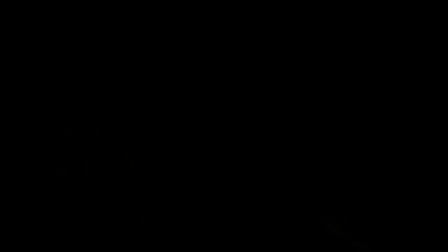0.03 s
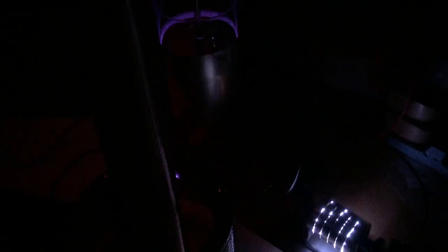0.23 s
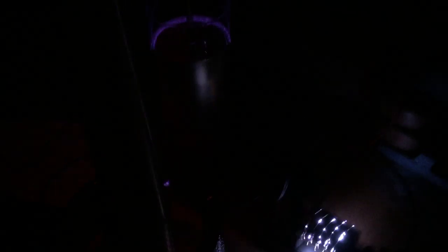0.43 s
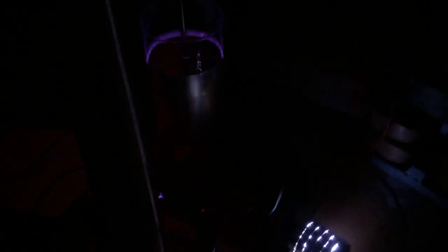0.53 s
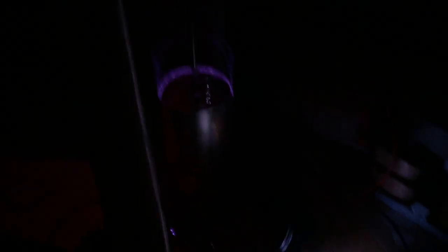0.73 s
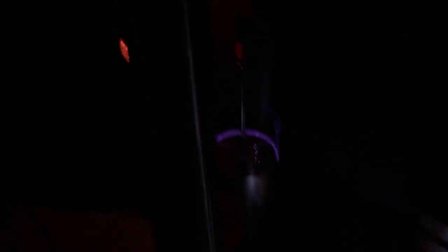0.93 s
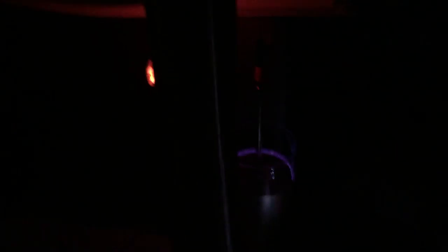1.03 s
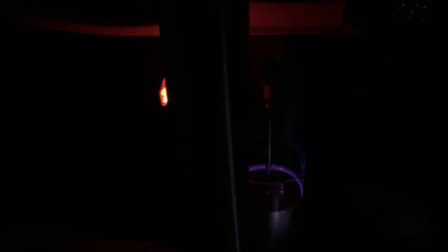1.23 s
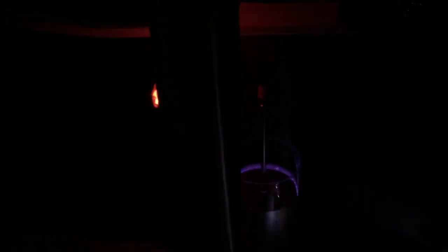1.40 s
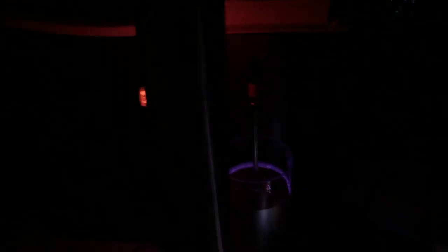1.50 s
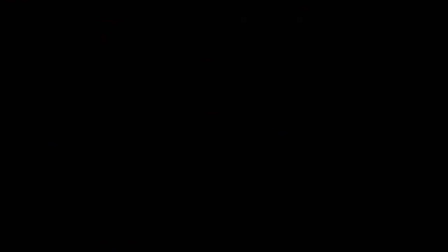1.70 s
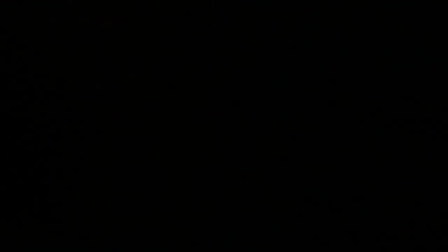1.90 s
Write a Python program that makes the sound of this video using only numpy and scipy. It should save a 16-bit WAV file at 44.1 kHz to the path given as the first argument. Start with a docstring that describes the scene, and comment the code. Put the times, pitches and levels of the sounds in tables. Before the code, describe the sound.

A high-voltage coil crackles and snaps with buzzing sparks, stopping suddenly in a small room.

```python
"""A small room, the microphone close to a high-voltage coil that runs for a second and a half.
The switch ticks, then the spark gap fires in bursts on each half-cycle of the mains, stalling twice
at first. Streamers off the top snap and thump as they heat the air, and the transformer buzzes
under load. At switch-off the room rings out over the low hum of the idle equipment."""
import sys
import numpy as np
from scipy import signal
from scipy.fft import rfft, irfft
from scipy.io import wavfile
from scipy.ndimage import uniform_filter1d

SR = 44100
rng = np.random.default_rng(int(sys.argv[2]) if len(sys.argv) > 2 else 0)


def log_audio(samples):
    """Write samples as a 16-bit WAV file to the path given in sys.argv[1]."""
    # one column per channel
    frames = np.atleast_2d(samples).T
    # limit to full scale, then quantise
    limited = np.clip(frames, -1, 1)
    pcm = np.round(limited * 32767).astype(np.int16)
    wavfile.write(sys.argv[1], SR, pcm)


N = 85995

# spectrum of the room tone: f/Hz, relative level/dB
AIR_COLOUR = [(30, -17.5), (80, 0.5), (160, -3.5), (350, -9), (500, -10), (750, -9.5), (1000, -14),
              (1600, -14.5), (4000, -24), (8000, -30), (15000, -46.5)]
# partials of the idle hum: f/Hz, level before the coil runs/dB, level after/dB
HUM_PARTIALS = [(98, -48, -54), (185, -77.5, -61.5), (300, -75.5, -65.5), (370, -77.5, -73)]
# quick decay of the room: f/Hz, T60/s
ROOM_DECAY = [(100, 0.57), (300, 0.49), (800, 0.29), (2000, 0.18), (5000, 0.15), (13000, .16)]
# transformer harmonics: multiple of the ripple, relative level/dB, release/s
BUZZ_HARMONICS = [(1, -30.5, 0.034), (2, -41, 0.094), (4, -32, 0.034), (5, -41.5, 0.041), (6, -35.5, 0.022)]
# swell of the buzz under load: t/s, gain/dB
LOAD_SWELL = [(.24, 0.5), (.4, -7), (.75, 3.5), (1.05, 5), (1.3, -2), (1.42, -11), (1.53, 1), (1.67, 3)]
# loudest cracks of the streamers: t/s, relative level/dB
LOUD_CRACKS = [(0.2384, -7), (0.2501, -5), (0.2613, -5), (0.2708, -6), (0.3277, -5), (0.3493, -8),
               (0.3666, -6), (0.4381, -9), (0.4765, -8), (0.4917, -9), (0.5111, -10), (0.5801, -10),
               (0.6302, -8), (0.6526, -10), (0.6715, -8), (0.7017, -8), (0.7308, -7), (0.7378, -6),
               (0.7467, -10), (0.7532, -8), (0.7599, -7), (0.769, -11), (0.8215, -10), (0.8475, -11),
               (0.9094, -10), (1.0102, -11), (1.0613, -10), (1.0691, -11), (1.0976, -11), (1.1299, -10),
               (1.2482, -5), (1.3217, -10), (1.3904, -8), (1.4184, -11), (1.4308, -10), (1.5381, -9),
               (1.5467, -11), (1.5571, -11), (1.6577, -11), (1.6685, -9)]
# thumps of heated air from the longest arcs: t/s, relative level/dB
LOUD_THUMPS = [(.2508, -2), (.2605, -10), (.3206, -16), (.3688, -9), (.378, -13), (.4406, -13), (.4777, -7),
               (.488, -11), (.6551, -10), (.668, -12), (.7586, -11), (.8297, -14), (.976, -15),
               (.9885, -12), (1.1581, -14), (1.2578, -11), (1.288, -13), (1.351, -15), (1.4074, -13),
               (1.4286, -14), (1.4865, -14), (1.6606, -14), (1.674, -13)]
# spectrum of the streamers' early reflections: f/Hz, relative level/dB
REFLECTION_COLOUR = [(80, -21.5), (200, -3), (450, 2.5), (670, 5), (820, -4), (960, 4.5), (1500, -4),
                     (3000, -4), (8000, -11), (15000, -11.5)]
# stretches in which the gap fires: start/s, end/s, gain/dB
FIRING_RUNS = [(0.2365, 0.273, 5), (0.306, .401, 2), (0.423, 1.674, 2)]
# faint ticks as the switch closes: t/s, relative level/dB
SWITCH_TICKS = [(.2125, -49), (.2158, -47.5), (.2243, -43.5), (.228, -45.5)]
# spectrum of the spark gap: f/Hz, relative level/dB
SPARK_COLOUR = [(150, -31), (600, 6.5), (1200, -8.5), (2450, -3), (3500, -5), (4300, -2.5), (4950, -5),
                (6000, -2.5), (7400, -3.5), (8800, -1.5), (9700, -4), (10450, -10), (11200, -2.5),
                (12100, 1), (13100, 0), (15200, -2)]
# housing rings that change as the microphone moves: f/Hz, width/Hz, first gain/dB, last gain/dB
HOUSING_RINGS = [(4300, 350, 4, -9), (5520, 350, -10.5, -0.5)]

ON_S, OFF_S = FIRING_RUNS[0][0], FIRING_RUNS[-1][1]
RIPPLE_HZ, SPARK_RING_S = 100.1, .0034  # mains half-cycles a second; decay of a spark's rattle


def undb(db):
    """Decibels to gain."""
    return 10 ** (np.asarray(db) / 20)


def rms(x):
    """Root mean square."""
    return np.sqrt(np.mean(x ** 2))


def lookup(points, hz):
    """Read (f/Hz, value) points on a log-frequency axis."""
    freqs, values = np.array(points).T
    return np.interp(np.log(np.maximum(hz, 1)), np.log(freqs), values)


def ring(x, response):
    """Pass x through an impulse response."""
    return signal.fftconvolve(x, response)[:len(x)]


def colour(x, points):
    """Minimum-phase filter with the given (f/Hz, level/dB) shape and unit power gain."""
    size = 4096
    gain = undb(lookup(points, np.fft.rfftfreq(size, 1 / SR)))
    cepstrum = irfft(np.log(gain / rms(gain)))
    cepstrum[1:size // 2] *= 2
    cepstrum[size // 2 + 1:] = 0
    return ring(x, irfft(np.exp(rfft(cepstrum))))


def impulses(times, sizes):
    """Single-sample kicks at the given times."""
    return np.bincount(np.clip(np.asarray(times) * SR, 0, N - 1).astype(int), sizes, N)


def cues(rows):
    """Kicks from (t/s, level/dB) rows."""
    times, db = np.array(rows).T
    return impulses(times, undb(db))


def fade(t, decay_s):
    """Exponential decay of unit energy."""
    decay = np.exp(-t / decay_s)
    return decay / np.sqrt(np.sum(decay ** 2))


def scatter(x, t, decay_s):
    """A fresh burst of dying noise after everything in x, with the same energy."""
    power = np.abs(ring(x ** 2, fade(t, decay_s) ** 2))
    return np.sqrt(power) * rng.standard_normal(N)


def walk(rate_hz):
    """Smooth random drift of unit RMS."""
    hold = int(SR / rate_hz)
    steps = np.repeat(rng.standard_normal(N // hold + 1), hold)
    drift = uniform_filter1d(uniform_filter1d(steps, hold), hold)[:N]
    return drift / rms(drift)


def tone(t, hz):
    """Sine of unit RMS and random phase."""
    return np.sqrt(2) * np.sin(2 * np.pi * (hz * t + rng.random()))


def glide(t, first, last):
    """Move from first to last over the coil's running time."""
    return np.interp(t, [ON_S, OFF_S], [first, last])


def room_tone(t):
    """Idle equipment hums, wavering slightly, over quiet room air."""
    hum = sum(undb(glide(t, before, after) + .55 * walk(rate_hz=35)) * tone(t, hz)
              for hz, before, after in HUM_PARTIALS)
    return hum + undb(-62.5) * colour(rng.standard_normal(N), AIR_COLOUR)


def room_echo(x, t):
    """The walls return a diffuse echo: a quick decay, then a faint, longer one in the upper middle."""
    late_hz, late_stretch = 3200, 3.1
    noise, hz = rfft(rng.standard_normal(N)), np.fft.rfftfreq(N, 1 / SR)
    tail = 0
    for centre, t60 in ROOM_DECAY:
        band = lookup([(f, float(f == centre)) for f, _ in ROOM_DECAY], hz)
        fall = np.log(1000) * t / t60
        late = undb(-15.5) * min(centre / late_hz, late_hz / centre) * np.exp(-fall / late_stretch)
        tail = tail + irfft(noise * band, N) * (np.exp(-fall) + late)
    return ring(x, tail / np.sqrt(np.sum(tail ** 2)))


def transformer(t):
    """Mains harmonics swell under load and die away at switch-off."""
    load = undb(np.interp(t, *np.array(LOAD_SWELL).T)) * (t > ON_S)
    since_off = np.maximum(t - OFF_S, 0)
    buzz = 0
    for multiple, db, release_s in BUZZ_HARMONICS:
        envelope = undb(db + 2 * walk(rate_hz=7.96)) * np.exp(-since_off / release_s)
        buzz = buzz + envelope * tone(t, multiple * RIPPLE_HZ)
    return load * buzz


def firing(times):
    """Discharge strength: nil outside the runs, hard as each strikes, weak in each half-cycle's lull."""
    lull_at_s, restrike_s = .3546 - SPARK_RING_S / 2, .003
    lull_width, lull_edge = .26, .13  # shares of a half-cycle
    from_lull = np.abs(((times - lull_at_s) * RIPPLE_HZ + .5) % 1 - .5)
    ripple = np.clip((from_lull - lull_width / 2) / lull_edge + .5, .42, 1)
    strength = 0
    for start, end, db in FIRING_RUNS:
        restrike = undb(-2.5) * np.exp(-np.abs(times - start) / restrike_s)
        running = (times >= start) & (times < end)
        strength = strength + undb(db) * np.maximum(ripple, restrike) * running
    return strength


def pressure_pulse(t, peak_s):
    """One-sided pulse that reaches -1 at peak_s and dies away."""
    return -t / peak_s * np.exp(1 - t / peak_s)


def streamers(t):
    """Arcs into the air: a crack with reflections that differ each time, and a thump of heated air."""
    count, snaps_per_s, spread_db = 1400, 420, 5.5
    times = (np.arange(count) + rng.random(count)) / snaps_per_s
    snap_db, thump_db = spread_db * np.minimum(rng.standard_normal((2, count)), 1.5)
    sizes = firing(times) * undb(snap_db)
    cracks = cues(LOUD_CRACKS) + impulses(times, sizes * undb(-22))
    thumps = cues(LOUD_THUMPS) + impulses(times, sizes * undb(thump_db - 32))
    front = ring(cracks, pressure_pulse(t, peak_s=.00007))
    body = undb(-14) * ring(cracks, pressure_pulse(t, peak_s=.00046))  # slower push behind the front
    reflections = colour(scatter(front, t, decay_s=.0025), REFLECTION_COLOUR)
    crack = undb(4) * (front + body) + undb(5) * reflections
    thump = undb(5) * ring(thumps, pressure_pulse(t, peak_s=.00145))
    return crack, thump


def spark_gap(t):
    """Switch ticks, then uneven sparks, each a bright crack that rattles briefly in the gap's housing."""
    count, sparks_per_s = 3000, 540
    # the sparks start loud, drop quickly, then slowly fade
    opening_boost_db, settle_s, sag_db_per_s = 7.5, .16, 2
    jitter, spread = rng.standard_normal((count, 2)).T
    times = ON_S + (np.arange(count) + .35 * jitter) / sparks_per_s
    times[:len(FIRING_RUNS)] = [start for start, _, _ in FIRING_RUNS]  # a spark opens each run
    age = np.maximum(times - ON_S, 0)
    db = -16.5 + opening_boost_db * np.exp(-age / settle_s) - sag_db_per_s * age + 2 * spread
    kicks = impulses(times, firing(times) * undb(db)) + cues(SWITCH_TICKS)
    kicks *= np.sqrt(SR / sparks_per_s)
    alike = .1  # weight of the rattle that is the same for every spark
    housing = alike * ring(kicks, fade(t, SPARK_RING_S) * rng.standard_normal(N))
    rattle = np.sqrt(1 - alike ** 2) * scatter(kicks, t, SPARK_RING_S)
    sparks = colour(housing + rattle, SPARK_COLOUR)
    rings = 0
    for hz, width, first_db, last_db in HOUSING_RINGS:
        resonance = signal.lfilter(*signal.iirpeak(hz, hz / width, SR), sparks)
        rings = rings + undb(glide(t, first_db, last_db)) * resonance
    return sparks + rings


def scene():
    """The coil from close by, in mono, with the room's echo behind its sparks and cracks."""
    t = np.arange(N) / SR
    gap = spark_gap(t)
    crack, thump = streamers(t)
    echo = room_echo(undb(-15.5) * gap + undb(-7.5) * crack, t)
    return (gap + crack + thump + echo + transformer(t) + room_tone(t))[None]


def record(dry):
    """The close microphone drops the deep bass, rounds the loudest peaks and cuts the top."""
    low_hz, top_hz = 47.4, 15350
    x = signal.sosfilt(signal.butter(3, low_hz, "high", fs=SR, output="sos"), dry)
    rounded = x / (1 + x ** 4) ** (1 / 4)
    return signal.sosfilt(signal.ellip(12, .2, 90, top_hz, fs=SR, output="sos"), rounded)


dry = scene()
out = record(dry)
log_audio(out)
```